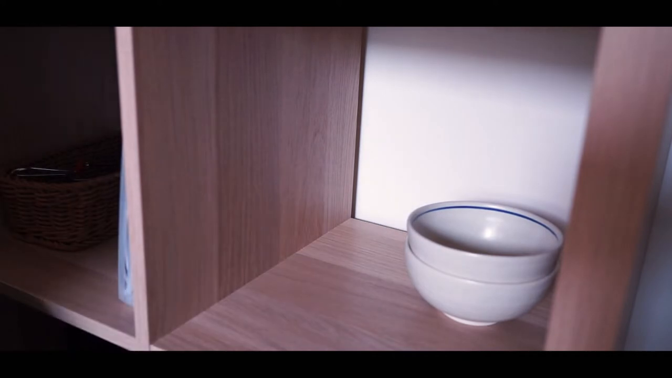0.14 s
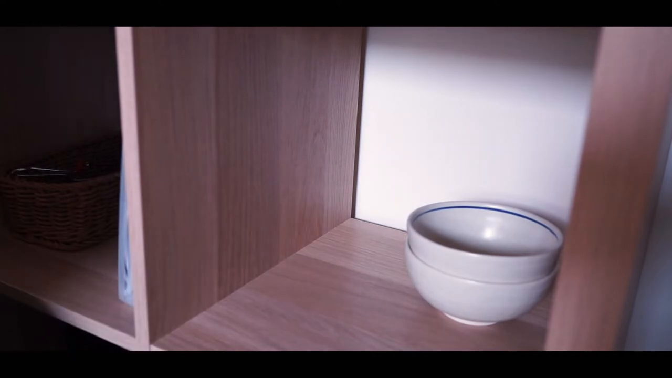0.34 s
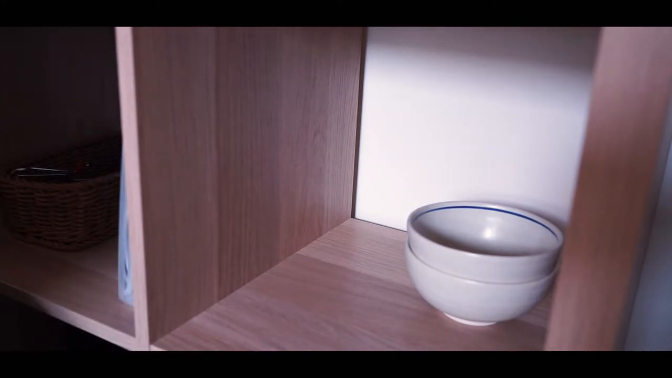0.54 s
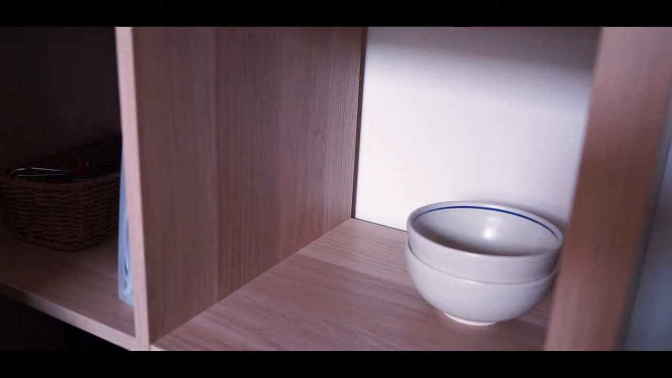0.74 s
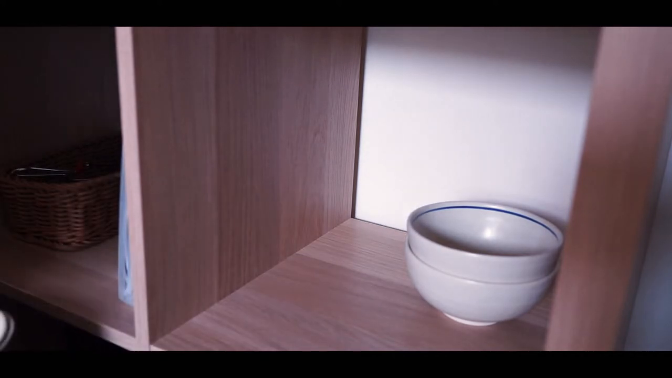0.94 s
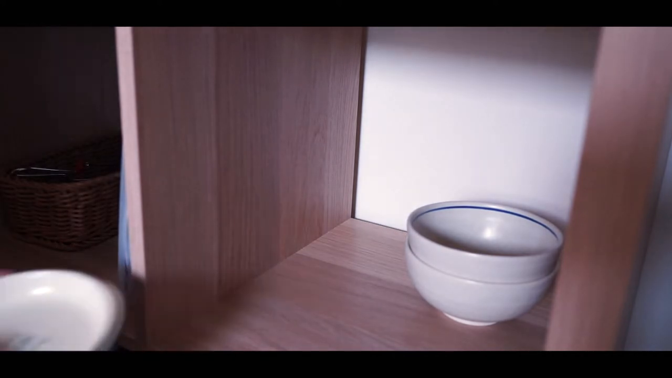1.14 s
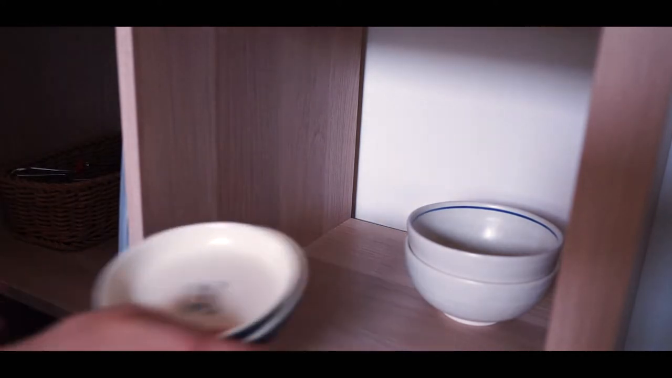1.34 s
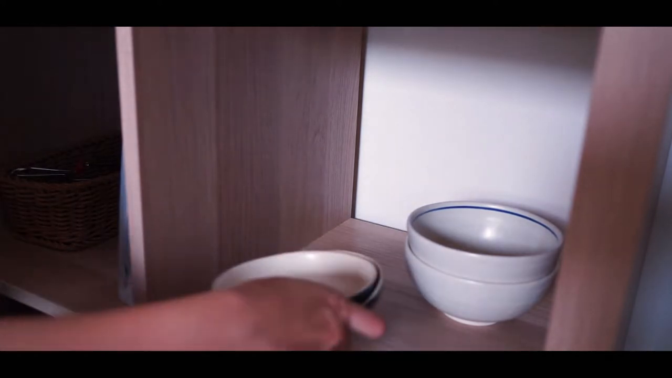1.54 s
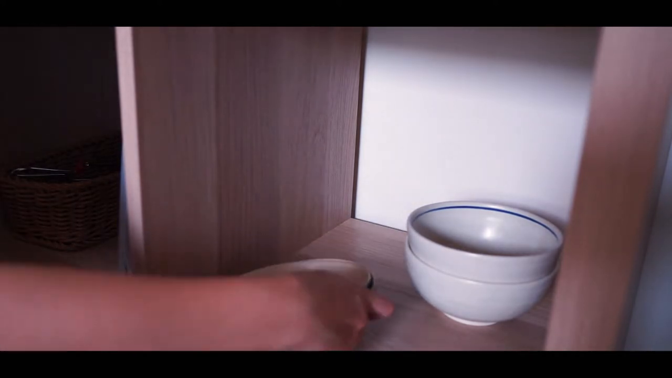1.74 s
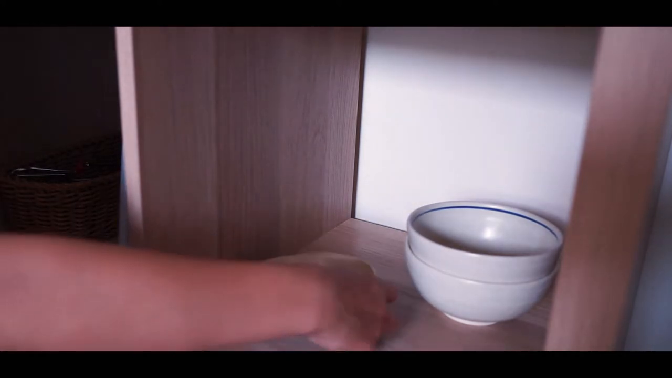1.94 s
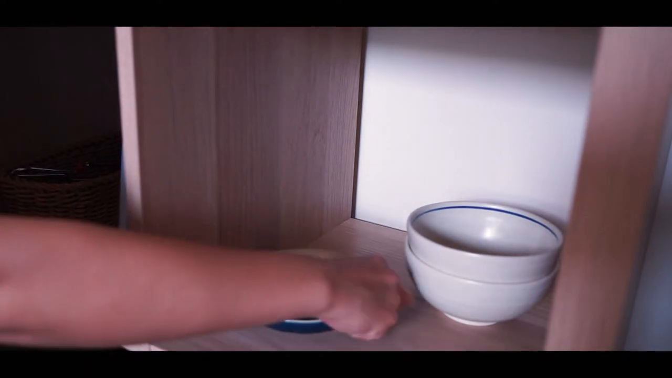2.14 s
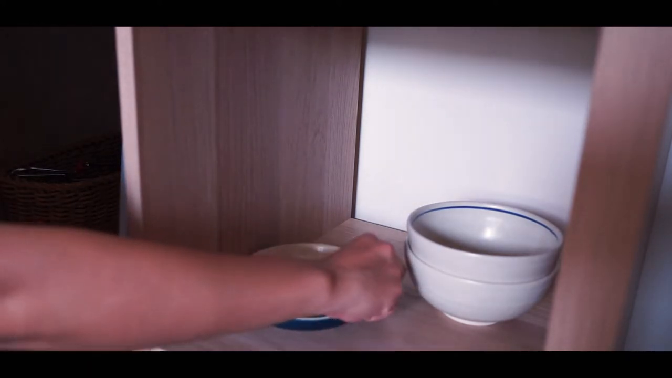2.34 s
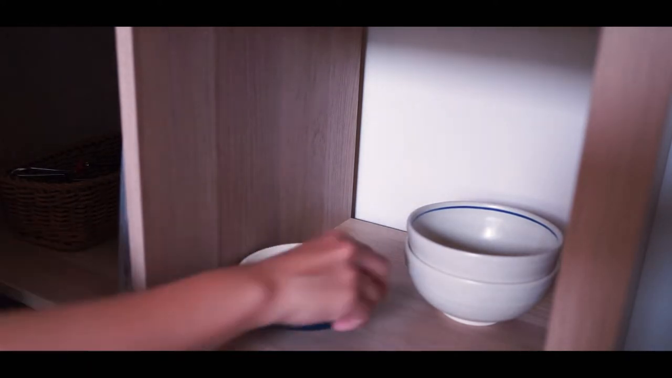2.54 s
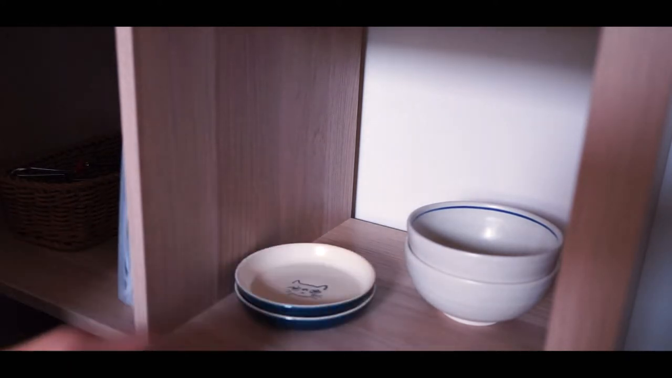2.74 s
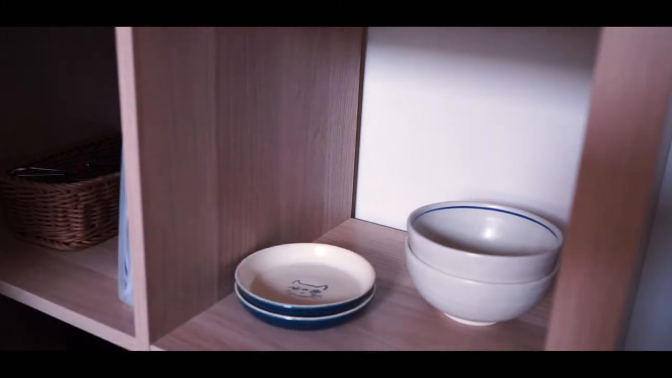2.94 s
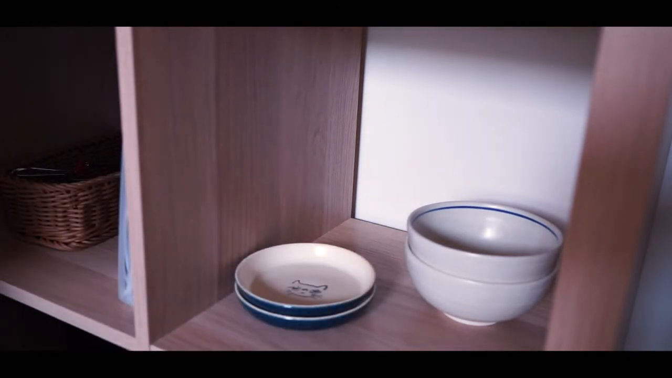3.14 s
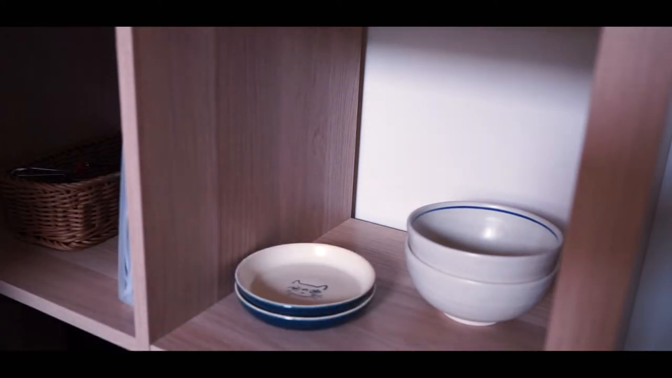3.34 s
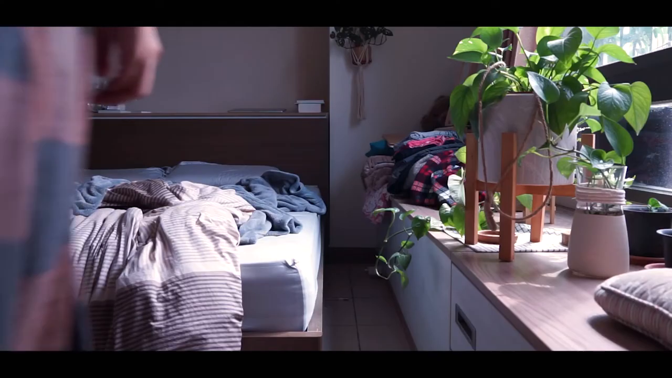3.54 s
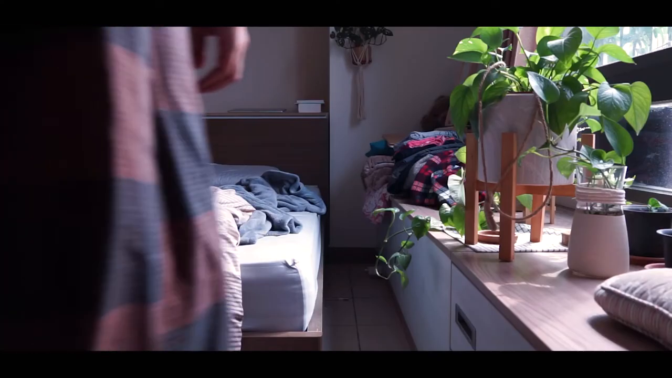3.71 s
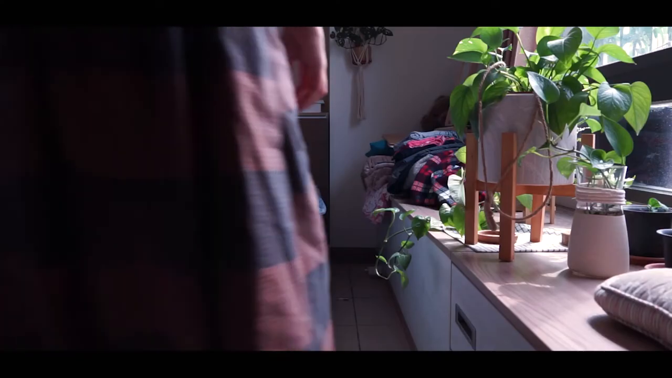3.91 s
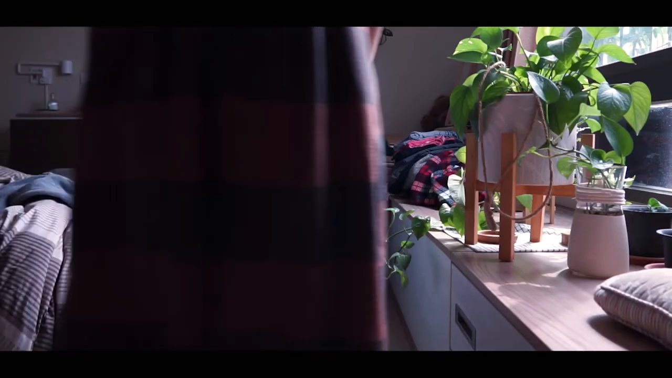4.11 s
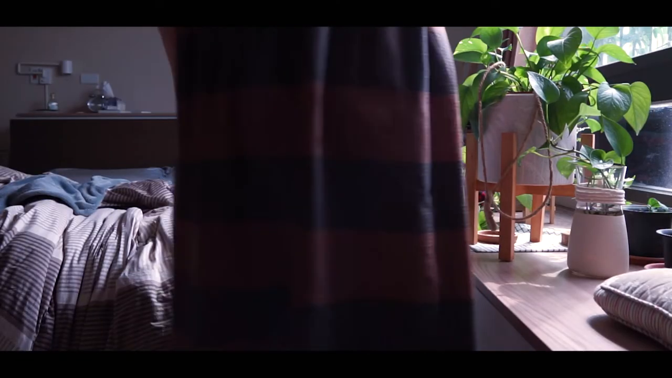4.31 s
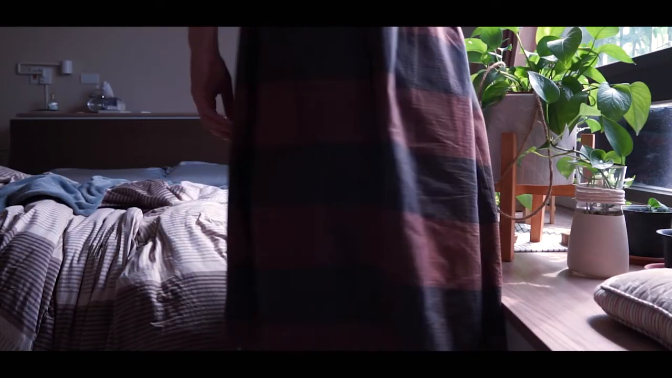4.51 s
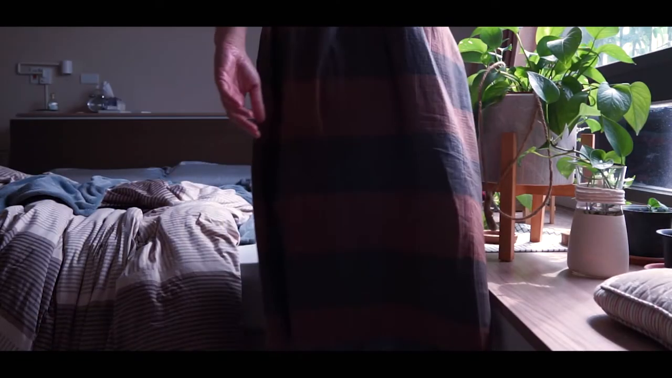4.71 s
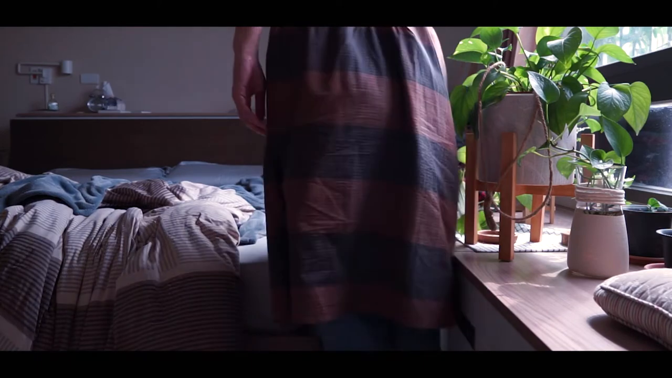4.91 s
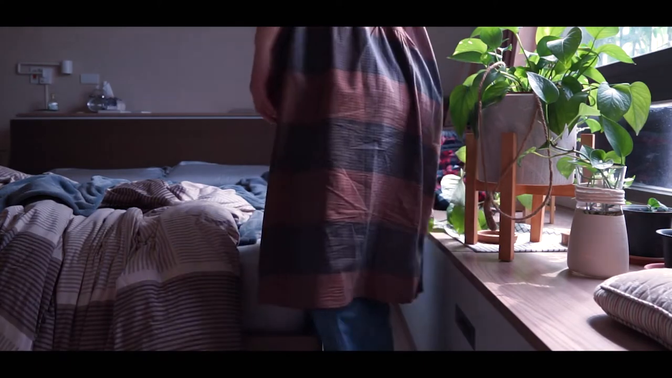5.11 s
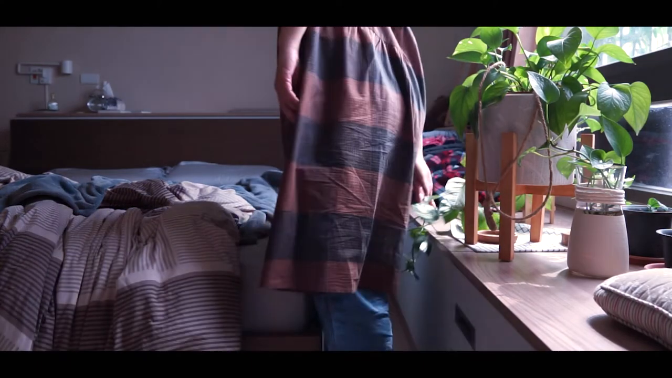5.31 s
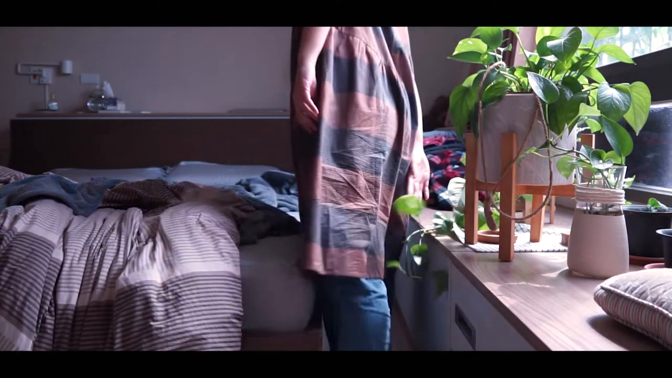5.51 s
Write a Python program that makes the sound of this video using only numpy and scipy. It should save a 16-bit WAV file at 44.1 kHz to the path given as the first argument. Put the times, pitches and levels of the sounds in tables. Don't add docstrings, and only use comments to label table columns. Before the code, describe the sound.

From the very start, two stacked ceramic dishes jostle in a hand close to the microphone: short mid-pitched clinks, gritty rim grinding and bright glaze scuffs, with stronger knocks near 0.15 and 0.8 seconds. The clinks thin out after 1 second, with a few light taps around 1.3 and 1.65. At 1.8 the dishes land hard on a wooden shelf, with a woody knock, rattle and boxed-in air boom; nudges follow from 2.04, and the loudest knock comes at 2.17 with a bright ping. A small tick follows at 2.34. Birds whistle falling calls outside at 2.4 and 3.0. A close sleeve swish and footfalls begin around 3.3, and at 3.48 the scene cuts to a bedroom hush. Soft low steps thud to about 4.1 and again at 5.0 and 5.35, a loose dress rustles each stride, and distant birds slur from 4.4 to the end. Faint traffic rumbles beneath.

```python
import sys
import numpy as np
from scipy import signal
from scipy.fft import rfft, irfft, next_fast_len
from scipy.io import wavfile
from scipy.ndimage import uniform_filter1d

SR = 44100
rng = np.random.default_rng(int(sys.argv[2]) if len(sys.argv) > 2 else 0)


def volts_from_db(level):
    exponent = np.asarray(level, float) / 20
    return 10 ** exponent


def file_out(sig):
    cols = np.atleast_2d(sig).T
    lim = np.clip(cols, -1, 1)
    pcm = np.round(lim * 32767).astype(np.int16)
    wavfile.write(sys.argv[1], SR, pcm)


N = 249595
CHANGE_S = 3.478


def evened(x):
    return x / np.sqrt(np.mean(x ** 2) + 1e-20)


def read(points, hz):
    f, value = np.transpose(points)
    return np.interp(np.log(hz + 1), np.log(f + 1), value)


def add(mix, s, sound):
    part = mix[..., round(s * SR):][..., :sound.shape[-1]]
    part += sound[..., :part.shape[-1]]


def lean(db):
    return volts_from_db(np.array([[db / 2], [-db / 2]]))


def blend(left, other, same):
    return same * left + np.sqrt(1 - same ** 2) * other


def likeness(hz):
    return 1 / (1 + (hz / 2200) ** 3.2)


def band(x, lo_hz, hi_hz):
    edges = [lo_hz, min(hi_hz, SR / 2 - 1000)]
    return signal.sosfilt(signal.butter(3, edges, "bandpass", fs=SR, output="sos"), x)


def resonate(x, hz, width):
    turn = np.exp(2j * np.pi * np.cumsum(hz) / SR)
    r = np.exp(-np.pi * width / SR)
    return 2 * (turn * signal.lfilter([1 - r], [1, -r], x / turn)).real


def swells(rows, rise, fall):
    s, hold, db = np.transpose(rows)[..., None]
    t = np.arange(0, N + 64, 32) / SR
    gain = volts_from_db(db - rise * np.maximum(s - t, 0) - fall * np.maximum(t - s - hold, 0)).sum(0)
    return np.interp(np.arange(N) / SR, t, gain)


def clumps(db, smooth):
    return volts_from_db(db * evened(uniform_filter1d(rng.standard_normal(N), size=smooth)))


def in_bedroom():
    return np.clip((np.arange(N) / SR - CHANGE_S) / 0.003, 0, 1)


def hiss(colour, patchy_db, same):
    frames, hz = N // 256 + 5, np.fft.rfftfreq(1024, 1 / SR)
    a, b, c, d, patches = rng.standard_normal((frames, 513, 5)).T
    patches = evened(uniform_filter1d(uniform_filter1d(patches, 12, 0), 10, 1))
    same = np.clip(same(hz), -1, 1)[:, None]
    left = a + 1j * b
    z = np.array([left, blend(left, c + 1j * d, same)])
    z *= volts_from_db(read(colour, hz)[:, None] + patchy_db * patches)
    return evened(signal.istft(z, nperseg=1024, noverlap=768)[1][:, :N])


def tail(decays, gap_s, same):
    echoes = np.zeros((2, SR))
    at = np.arange(round(gap_s * SR), SR - 20, 20)
    at = at + rng.integers(0, 20, (2, len(at)))
    np.put_along_axis(echoes, at, rng.choice([-1., 1.], at.shape), 1)
    hz, t, z = signal.stft(echoes, SR, nperseg=256)
    z[1] = blend(z[0], z[1], np.clip(same(hz), 0, 1)[:, None])
    out = signal.istft(z * volts_from_db(-60 * t / read(decays, hz)[:, None]), SR, nperseg=256)[1]
    return out / np.linalg.norm(out[0])


def tone(rows, waver, smooth):
    s, hz, db = np.transpose(rows)
    t = np.arange(s[0], s[-1], 1 / SR)
    hz = np.interp(t, s, hz) * (1 + waver * evened(uniform_filter1d(rng.standard_normal(len(t)), size=smooth)))
    fade = signal.windows.tukey(len(t), .15)
    return s[0], np.sqrt(2) * volts_from_db(np.interp(t, s, db)) * np.sin(2 * np.pi * np.cumsum(hz) / SR) * fade


def dying_modes(table, rise_s):
    out, t = np.zeros(N), np.arange(12000) / SR
    for s, db, hz, t60 in table:
        add(out, s, volts_from_db(db - 60 * t / t60) * np.sin(2 * np.pi * hz * t) * np.minimum(t / rise_s, 1))
    return out


# pitch_hz, level_db_per_hz
RUMBLE_COLOUR = [(38, -35), (50, -17), (75, 32), (110, 8), (150, -38), (300, -54)]
# start_s, hold_s, level_db
PASSES = [
    (0.5, 0.076, -67),
    (1.0, 0.43, -66),
    (1.95, 0.0504, -64),
    (5.0, .15, -71),
]


def traffic():
    shelf_room_db, bedroom_db = -61.5, -68
    steady = volts_from_db(shelf_room_db + (bedroom_db - shelf_room_db) * in_bedroom())
    gain = steady + swells(PASSES, rise=95, fall=99)
    return lean(2.7) * gain * hiss(RUMBLE_COLOUR, 1.1, likeness)


# pitch_hz, level_db_per_hz
SHELF_ROOM_TONE = [(59, -22), (100, -24.5), (271, -3.5), (315, -8), (513, -9), (1720, -16), (2270, -15.5),
                   (3320, -21.5), (9820, -33), (10900, -33.5), (16000, -38)]
# pitch_hz, level_db_per_hz
BEDROOM_TONE = [(53, -31), (90, -6.5), (229, -6), (290, -6.5), (323, -10.5), (647, -11), (721, -13),
                (786, -12), (2180, -19), (3740, -22), (16000, -38)]
# pitch_hz, left_right_likeness
TONE_LIKENESS = [(60, 1), (180, 0.97), (550, 0.84), (1650, 0.47), (4970, -0.44), (15000, 0.44)]


def hush():
    after = in_bedroom()
    first = volts_from_db(-50) * hiss(SHELF_ROOM_TONE, 1.2, lambda hz: read(TONE_LIKENESS, hz))
    second = volts_from_db(-50.5) * hiss(BEDROOM_TONE, 0.7, lambda hz: read(TONE_LIKENESS, hz))
    return lean(1.6) * (np.sqrt(1 - after) * first + np.sqrt(after) * second)


def whistle(s, length, first_hz, last_hz, db):
    settle_s, open_s, hold_s = 0.055, 0.022, 0.068
    open_db, fade_db_per_khz = -4, -26
    t = np.linspace(0, length, num=40)
    fade_db = fade_db_per_khz * (first_hz - last_hz) / 1000
    shape_db = np.interp(t, [0, open_s, open_s + hold_s, length], [open_db, 0, 0, fade_db])
    hz = last_hz + (first_hz - last_hz) * np.exp(-t / settle_s)
    return tone(np.transpose([s + t, hz, db + shape_db]), waver=.004, smooth=300)


def slur(s, length, first_hz, last_hz, db):
    u = np.linspace(0, 1, num=20)
    arch_db = -8.5 * (2 * u - 1) ** 2
    rows = np.transpose([s + u * length, first_hz + (last_hz - first_hz) * u, db + arch_db])
    return tone(rows, waver=.16 if length < .085 else .05, smooth=120)


# start_s, length_s, first_hz, last_hz, level_db
WHISTLES = [
    (2.443, 0.4, 3050, 2216, -50.5),
    (2.99, 0.26, 2996, 2120, -52),
    (3.981, 0.25, 2290, 2165, -64.5),
]
# start_s, length_s, first_hz,
# last_hz, level_db
SLURS = [
    (2.411, .09, 3100, 3550, -58.5),
    (3.028, 0.16, 7500, 6000, -68),
    (2.898, 0.059, 3600, 1724, -51),
    (3.146, 0.063, 3480, 1720, -50),
    (4.43, 0.2, 3253, 1296, -51.5),
    (4.9, 0.097, 2774, 1666, -56.5),
    (5.172, 0.16, 3090, 1408, -50.5),
    (5.497, 0.041, 3200, 1400, -48.5),
    (5.564, 0.11, 2585, 1516, -57),
]
# pitch_hz, t60_s
OUTDOORS = [(1200, 1), (2400, 0.71), (4000, 0.68)]


def birds():
    clear, hoarse = np.zeros((2, N))
    for row in WHISTLES:
        add(clear, *whistle(*row))
    for row in SLURS:
        add(hoarse, *slur(*row))
    sent = volts_from_db(1.5) * clear + volts_from_db(3.0) * hoarse
    echo = signal.fftconvolve(sent[None], tail(OUTDOORS, 0.0083, likeness), axes=1)
    return volts_from_db(0.5) * clear + volts_from_db(-4.5) * hoarse + echo[:, :N]


# start_s, peak_db, pitch_hz, t60_s
STEPS = [
    (3.344, -37.5, 322, 0.05),
    (3.428, -42, 510, 0.07),
    (3.464, -33.5, 229, 0.05),
    (3.667, -49, 249, 0.34),
    (3.791, -45.5, 237, 0.19),
    (4.109, -44, 241, 0.12),
    (5.047, -42.5, 241, 0.11),
    (5.348, -53, 260, 0.25),
]


def footsteps():
    return dying_modes(STEPS, rise_s=0.0023)


# start_s, hold_s, level_db
SWISH = [
    (3.238, .03, -45.5),
    (3.29, .09, -36),
    (3.44, .05, -38.5),
]
# pitch_hz, level_db_per_hz
SWISH_COLOUR = [(410, -50), (700, -20), (1170, -2), (2460, -1), (5060, -2), (8530, 2.5), (15800, 3),
                (16300, -6)]
# start_s, hold_s, level_db
DRESS = [(3.54, 0.0092, -64), (3.64, 0.097, -57.5), (4.235, .01, -56.5), (4.46, 0.071, -58.5),
         (4.73, 0.0093, -67), (4.81, 0.1, -53), (5.01, 0.0087, -58.5), (5.22, 0.12, -55), (5.5, 0.086, -57)]
# pitch_hz, level_db_per_hz
DRESS_COLOUR = [(1470, -4.5), (2500, -6), (2810, -4), (3770, -6), (4550, -3), (9810, -6), (15600, -10),
                (16200, -40)]


def cloth():
    after = in_bedroom()
    swish = swells(SWISH, rise=510, fall=220) * (1 - after) * hiss(SWISH_COLOUR, 1.2, likeness) * lean(3.1)
    dress = swells(DRESS, rise=133, fall=113) * after * hiss(DRESS_COLOUR, 1.0, likeness) * lean(1.1)
    return swish + dress


# pitch_hz, width_hz, depth_db
VALLEYS = [(5070, 69, -17), (7020, 174, -7), (8750, 200, -12), (10070, 136, -8.5), (12080, 620, -15.5),
           (16200, 650, -5)]


def glazed(x):
    size = 2 * next_fast_len(N // 2 + 1)
    hz = np.fft.rfftfreq(size, 1 / SR)
    dips_db = sum(db * np.exp(-.5 * ((hz - at) / width) ** 2) for at, width, db in VALLEYS)
    dips = irfft(np.log(volts_from_db(dips_db)), size)
    dips = dips * np.where(np.arange(size) < size // 2, 2, 0) - dips[0] * (np.arange(size) == 0)
    return irfft(rfft(x, size) * np.exp(rfft(dips)), size)[:, :N]


# pitch_hz, width_hz, level_db
CUBBY = [
    (225, 28.6, -1.5),
    (306.2, 20, 2),
]


def cubby(table):
    push = np.zeros(N)
    for s, db, *_ in table:
        add(push, s, volts_from_db(db) * np.hanning(60))
    boom = 0
    for hz, width, db in CUBBY:
        curve = np.full(N, hz)
        boom = boom + volts_from_db(db) * resonate(resonate(push, curve, width), curve, 74)
    return volts_from_db(-21.0) * boom / abs(boom).max()


def grains_through(table, body, lean_db, same):
    gain = sum(swells([(s, 0, db)], 8700, 60 / t60) for s, db, t60 in table)
    grains = rng.standard_normal((2, N)) * clumps(2.1, 60)
    grains[1] = blend(grains[0], grains[1], same)
    sound = sum(volts_from_db(db) * band(grains, hz - width / 2, hz + width / 2) * np.sqrt(SR / width)
                for hz, width, db in body)
    return lean(lean_db) * gain * evened(sound)


# start_s, level_db, t60_s
SCUFFS = [(0.071, -40, .15), (0.1, -47, 0.23), (0.155, -47, 0.19), (0.2813, -39, .15), (0.35, -45, .25),
          (0.412, -37.5, 0.16), (0.4983, -40, .1), (0.5202, -39, 0.08), (0.666, -44, 0.41),
          (0.7357, -38, 0.25), (0.798, -36, 0.1), (0.9078, -42, 0.15), (0.9343, -40.5, 0.31),
          (1.044, -46, .1), (1.0705, -43, 0.032), (1.1024, -44.5, .04), (1.797, -31, 0.32),
          (1.948, -46, 0.21), (2.185, -43, .25)]
# pitch_hz, width_hz, level_db
GLAZE = [(6530, 400, 0.5), (7530, 540, -8), (9180, 770, 1), (10780, 500, -0.5), (11470, 320, 7),
         (13800, 970, -2), (15000, 300, -13)]


def scuffs():
    return grains_through(SCUFFS, GLAZE, lean_db=7.5, same=.1)


# start_s, level_db, t60_s
CLATTER = [(0.156, -27, 0.17), (0.281, -36, .15), (0.35, -36, 0.17), (0.423, -36, .15), (0.69, -36.5, .3),
           (0.737, -36.5, 0.23), (0.798, -22.5, 0.21), (0.931, -40.5, 0.18), (1.796, -26, 0.47),
           (2.037, -39, 0.17), (2.054, -24, 0.083), (2.061, -25, 0.12), (2.09, -42, 0.12),
           (2.172, -18.5, 0.1), (2.185, -26, 0.14), (2.206, -39, 0.44)]
# pitch_hz, width_hz, level_db
STONEWARE = [(594, 210, -1.5), (900, 270, 4), (1400, 520, -3), (2000, 760, -1.5), (3200, 690, -9),
             (4300, 760, -9), (5550, 770, -9.5), (6480, 500, -11.5)]


def clatter():
    return grains_through(CLATTER, STONEWARE, lean_db=1.0, same=0.78)


# pitch_hz, level_db_per_hz
RATTLE_COLOUR = [(900, -33), (1500, -5), (3500, 1), (6000, 1.5), (10000, -7.5), (14500, -11), (16000, -45)]


def rattle(table):
    rows = [(s + 0.0017, 0, db + sharp) for s, db, _, sharp, _ in table]
    gain = swells(rows, rise=8000, fall=60 / 0.44)
    return volts_from_db(-19.5) * gain * clumps(1.36, 90) * hiss(RATTLE_COLOUR, 2.4, likeness)


# start_s, hold_s, level_db
SING = [
    (1.078, 0.0081, -51.5),
    (1.252, 0.16, -56),
]


def sing():
    hz = 10640
    rows = [(1.0, hz, 0), (1.22, hz - 100, 0.015), (1.38, hz + 200, 0), (1.7, hz, 0.021)]
    s, line = tone(rows, waver=0.0087, smooth=100)
    return s, line * swells(SING, rise=560, fall=240)[round(s * SR):][:len(line)]


# start_s, peak_db, pitch_hz, t60_s
PINGS = [
    (0.3574, -32, 1610, 0.21),
    (0.395, -22.5, 1542, 0.12),
    (0.4643, -34, 1585, 0.067),
    (0.5057, -23, 2080, 0.024),
    (2.337, -25, 1980, 0.023),
    (2.184, -11, 3250, 0.063),
    (2.184, -16.5, 5760, 0.057),
]
# start_s, peak_db, pitch_hz, t60_s
THUMPS = [
    (0.259, -33, 440, 0.048),
    (0.349, -21.5, 460, 0.026),
    (0.693, -25.5, 460, 0.033),
    (0.797, -20, 432, 0.076),
    (0.934, -31, 499, 0.1),
    (1.336, -26, 480, 0.016),
]
# start_s, peak_db, pitch_hz, t60_s
HUMS = [(0.14, -30, 996, 0.32), (0.18, -24, 2440, 0.32), (.157, -20, 1300, 0.12), (.158, -14, 2000, 0.089),
        (.8, -20, 2150, 0.17), (.28, -24.5, 880, 0.42), (.8, -20, 2450, 0.28), (1.8, -20, 930, 0.44)]


def loose_modes():
    return dying_modes(PINGS + THUMPS + HUMS, rise_s=0.00076)


# start_s, pitch_hz
GRIP = [(0.0, 828), (0.17, 1033), (0.3, 937), (0.38, 704), (0.64, 775), (0.76, 864), (1.42, 860),
        (1.68, 756), (2.05, 870)]


def free_hz(s):
    return np.interp(s, *np.transpose(GRIP))


def rings(family, turns=0, free=None, damp_db=0):
    t = np.arange(SR // 8) / SR
    hz, db, t60 = np.transpose(family)[..., None]
    if free:
        db = db - max(damp_db, 0) * abs(np.log2(hz / free))
    pair = 1 + 0.25 * np.cos(2 * np.pi * 0.0019 * hz * t)
    modes = volts_from_db(db - 60 * t / t60) * pair * np.sin(2 * np.pi * (hz * t + turns))
    return modes.sum(-2) * np.cos(t / t[-1] * np.pi / 2)


# pitch_hz, level_db, t60_s
DISHES = [
    [(360, -26, .04), (480, 28.5, 0.031), (666, 28.5, 0.026)],
    [(666, 1.5, 0.029), (758, -5, 0.032), (846.4, -9, 0.085), (916, -2.5, 0.051), (995, -8, 0.093),
     (1159, -8.5, 0.1), (1320, 3, 0.076)],
    [(2000, 9.5, 0.013), (2240, 8, 0.031), (2391, 6, 0.07), (2560, -6, 0.045)],
    [(3290, -26, .04), (3876, 1, 0.052), (4190, 0.5, 0.11), (4428, 1, 0.046), (5730, 7.5, 0.017),
     (6483, 10, 0.13)],
    [(7500, -16, 0.056), (8500, -28.5, 0.027), (9600, -11.5, 0.04), (10650, -22, 0.041), (11330, -25, 0.03),
     (13520, -20.5, 0.017)],
]
# low_hz, high_hz, contact_s
RANGES = [
    (423, 700, 0.0094),
    (624, 2120, 0.0084),
    (1605, 3080, 0.0018),
    (3010, 5420, 0.0042),
    (6650, 13200, 0.0025),
]
# start_s, hold_s, chatter_db, rasp_db (against the chatter)
GRIND = [(0.0, 0.0057, -23.5, -13), (0.26, 0.011, -22.5, -21), (0.379, 0.012, -24, -11.5),
         (0.496, 0.011, -49.5, 13), (0.758, 0.019, -24.5, -9), (0.89, 0.072, -46, -9),
         (1.09, 0.008, -41.5, -6.5), (1.334, .05, -65, -1), (1.625, 0.054, -51, -2), (2.05, 0.037, -41, -6)]


def grind():
    hits = rng.random(N) < 2500 / SR
    slips = rng.standard_normal((2, N)) * hits * volts_from_db(4.5 * np.minimum(rng.exponential(1, N), 4))
    slips *= clumps(1.8, 700)
    slips[1] = 0.067 * slips[0] + 0.82 * slips[1]
    layers = []
    for family, (lo_hz, hi_hz, _) in zip(DISHES[2:], RANGES[2:]):
        ringing = signal.oaconvolve(slips, rings(family)[None], axes=1)[:, :N]
        layers.append(evened(band(ringing + volts_from_db(29.5) * slips, lo_hz, hi_hz)))
    mid, high, fizz = layers
    low = evened(band(resonate(slips[0], free_hz(np.arange(N) / SR), 64), 280, 1340))
    chatter = swells([row[:3] for row in GRIND], rise=230, fall=260)
    rasp = swells([(s, hold, db + rasp_db) for s, hold, db, rasp_db in GRIND], rise=230, fall=260)
    return volts_from_db(-8.5) * chatter * (low + volts_from_db(-4.5) * mid) + volts_from_db(-2) * rasp * (high + volts_from_db(-4.5) * fizz)


def strikes(table, body, leans, cracks_db, fizz_db, damp_db, rough):
    out, t = np.zeros((2, N)), np.arange(SR // 8) / SR
    noise = rng.standard_normal((len(table), 2, 2000))
    steps = np.maximum(1 - abs(t * 256 - np.arange(35)[:, None]), 0)
    chance = rng.standard_normal((len(table), 2, 10))
    for (s, db, clink, sharp, thud), (left, other), (spot, path) in zip(table, noise, chance):
        for k, rel_db in enumerate((thud, 0, clink, sharp, sharp + fizz_db)):
            lo_hz, hi_hz, contact_s = RANGES[k]
            same, size = likeness(np.sqrt(lo_hz * hi_hz)), len(body[k])
            family = np.array(body[k]) + 7.0 * spot[:size, None] * [0, 1, 0]
            turns = (1 - same) * 0.47 * path[:size, None] * [[[-1]], [[1]]]
            turns = turns + rough * other[350 * k:][:35 * size].reshape(size, -1) @ steps
            sound = rings(family, turns, free_hz(s) if k == 1 else None, damp_db)
            sound = sound * np.minimum(t / 0.00057, 1)
            crack = np.array([left, blend(left, other, same)]) * np.exp(-t[:2000] / contact_s)
            add(sound, 0, volts_from_db(cracks_db[k]) * crack * np.sqrt(SR / (hi_hz - lo_hz)) * 0.17)
            sound = band(sound, lo_hz, hi_hz)
            add(out, s, lean(leans[k]) * volts_from_db(db + rel_db) * sound / abs(sound).max())
    return out


# start_s, blow_db, then against the blow clink_db, sharpness_db, flat_thud_db
KNOCKS = [(1.795, -35, -1, -26, -55), (1.795, -6.5, -1.5, 4, -31), (1.815, -16, -3, -2, -30),
          (1.841, -10, -22, -24, -12.5), (1.893, -20, -1, -10, -29), (2.036, -26, -4, -3.5, -5),
          (2.054, -10, -33, -11, -46), (2.062, -25, 4.5, -24, -5), (2.09, -15, -8, -28, -33),
          (2.171, -1.5, -11, -19, -14), (2.177, -12.5, -1, -22, 0), (2.176, -10.5, -13, -24, -5),
          (2.18, -19.5, -21, -19, 0), (2.185, -10, -10, -1, -6.5), (2.205, -13, -24, -30, -25)]
# pitch_hz, level_db, t60_s
SHELF = [
    [(400, -20, 0.0094), (492, -7.5, 0.06), (590, 0.5, 0.0506), (637, 5, 0.056)],
    [(730, 9, 0.0092), (838, 0, 0.023), (904, -13.5, 0.041), (1090, -3, 0.018), (1274, -7.5, 0.0475),
     (1446, -13, 0.019)],
    [(2024, -1.5, 0.05), (2196, -7.5, 0.027), (2276, -10, 0.038), (2454, -10.5, 0.031), (2980, -15, 0.0097)],
    [(3250, -2, 0.032), (4010, -4, 0.063), (4230, 3, 0.038), (5080, 3, 0.0087), (5630, -29, 0.027),
     (5780, -26, 0.2), (6600, -1, 0.014)],
    [(7000, -1, 0.073), (8180, -6, 0.22), (8800, 11, 0.094), (10500, -10, 0.065), (10570, 0, 0.049),
     (11150, 9, 0.038), (12500, -1, 0.09)],
]
SHELF_LEAN = [2.5, 1.8, .3, 2.5, 2.1]
SHELF_CRACK = [5.6, 8.1, 13.7, 13, 6.1]


def shelf_knocks():
    knocks = strikes(KNOCKS, SHELF, SHELF_LEAN, SHELF_CRACK, fizz_db=-10, damp_db=-16, rough=.16)
    return knocks + lean(2.05) * cubby(KNOCKS)


# start_s, blow_db, then against the blow clink_db, sharpness_db
CLINKS = [(0.012, -23.5, -8, -19), (.022, -25, -19, -24), (0.056, -22.5, -10, -9), (0.073, -23.5, -4, 0.5),
          (0.098, -25, 6, -6), (0.155, -5, 4, -10), (.168, -12, 7, -17), (0.194, -43, 22, -13),
          (0.28, -21.5, 1, -9.5), (0.351, -22, 0, -8.5), (0.395, -16.5, -11, -22), (0.423, -22.5, 3.5, -3),
          (0.473, -22, -1, -10), (0.519, -30.5, 4, -1.5), (0.687, -32, 3, 1.5), (0.709, -15.5, -4, -19),
          (0.737, -15, -10, -15), (.75, -18, -12, -22), (.762, -26, -12, -15), (0.797, -2, -2, -17.5),
          (0.85, -27, -8, -25), (0.931, -21, -32, -12.5), (.946, -24, -28, -22), (1.048, -34, 0, -8),
          (1.121, -27, -9, -18), (1.327, -36.5, 2, -17), (1.338, -24.5, -13, -14.5), (1.608, -22, -19, -31),
          (1.663, -30.5, 0, -13), (1.686, -30, -10, -14)]
DISHES_LEAN = [-3, 2.5, 0.5, 14.5, 9.5]
DISHES_CRACK = [-15, -3.5, -25, 17.5, 2.5]


def held_dishes():
    blows = [(*row, -22.5) for row in CLINKS]
    held = strikes(blows, DISHES, DISHES_LEAN, DISHES_CRACK, fizz_db=-1.5, damp_db=47.5, rough=0.082)
    held = held + grind() + loose_modes()
    add(held, *sing())
    return held


# pitch_hz, t60_s
ROOM = [(200, 0.71), (600, 0.4), (1500, 0.43), (4000, 0.29), (9000, 0.35), (15000, 1)]


def scene():
    held, placed = held_dishes(), shelf_knocks()
    held_wet, placed_wet = [signal.fftconvolve(x, tail(ROOM, .003, likeness), axes=1)[:, :N]
                            for x in (held, placed)]
    near = volts_from_db(-2.5) * held + volts_from_db(-2.5) * held_wet + volts_from_db(1.5) * placed + placed_wet
    near = near + lean(1.1) * rattle(KNOCKS + [(*row, 0) for row in CLINKS])
    near = near + scuffs() + clatter()
    return glazed(near) + birds() + footsteps() + cloth() + hush() + traffic()


def band_limit(x):
    return signal.sosfilt(signal.butter(12, 16420, fs=SR, output="sos"), x)


def record(dry):
    ceiling = 1.05
    limited = np.tanh(dry / ceiling) * ceiling
    thin = signal.sosfilt(signal.butter(4, 46, "highpass", fs=SR, output="sos"), limited)
    top = signal.firwin(255, 15950, window=("kaiser", 8), fs=SR)
    thin = signal.oaconvolve(thin, top[None], "same")
    return band_limit(thin)


dry = scene()
out = record(dry)
file_out(out)
```